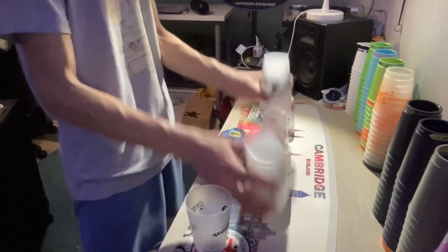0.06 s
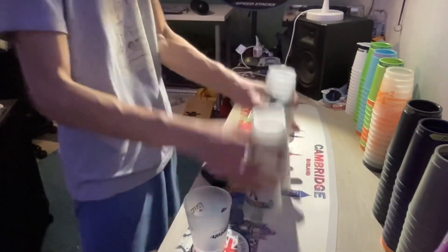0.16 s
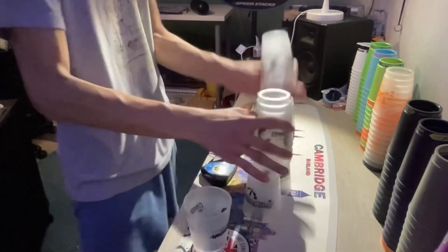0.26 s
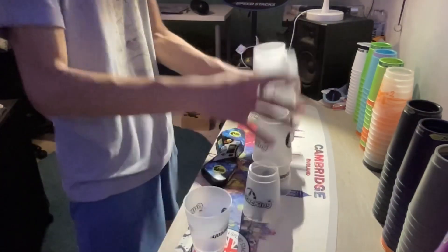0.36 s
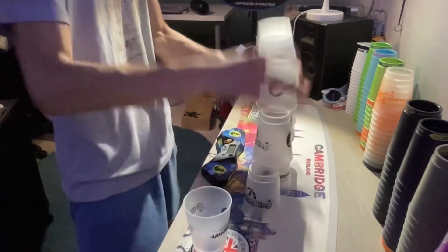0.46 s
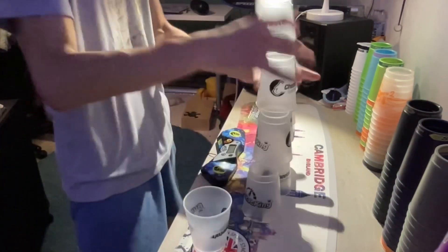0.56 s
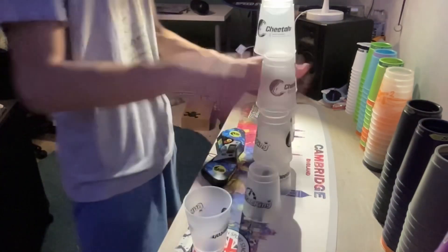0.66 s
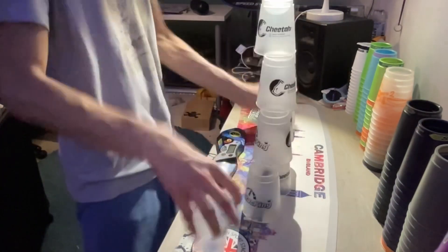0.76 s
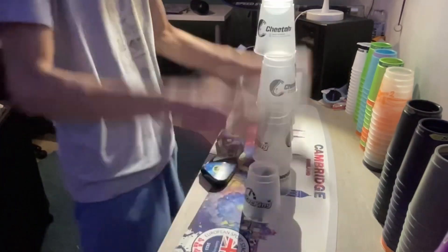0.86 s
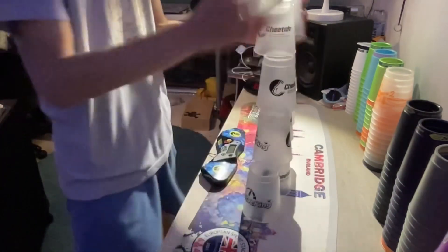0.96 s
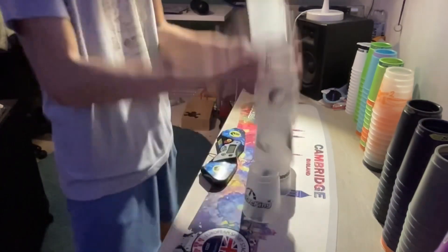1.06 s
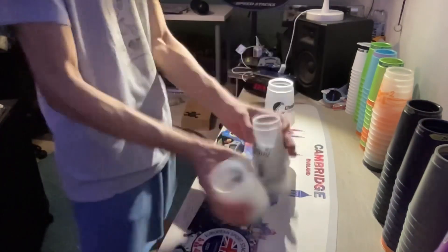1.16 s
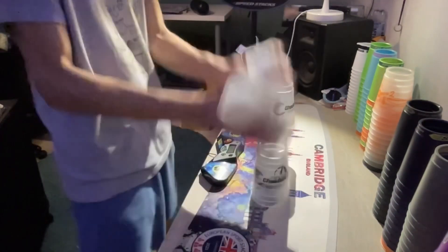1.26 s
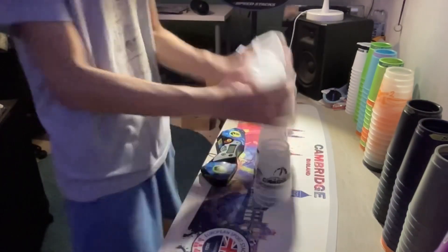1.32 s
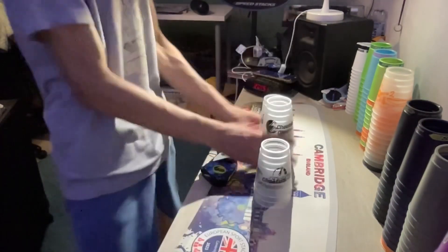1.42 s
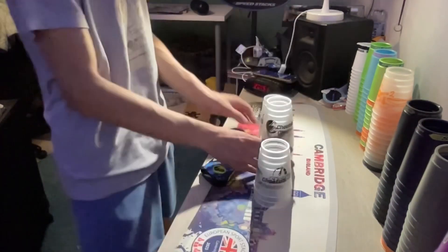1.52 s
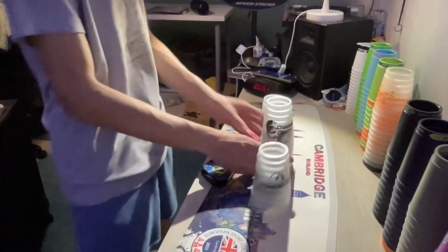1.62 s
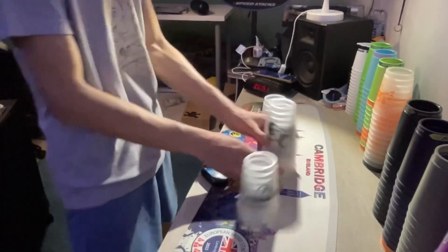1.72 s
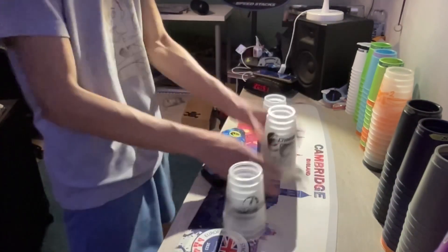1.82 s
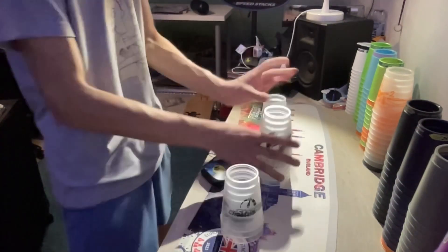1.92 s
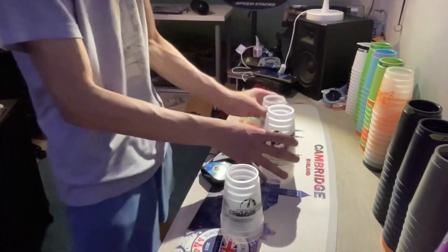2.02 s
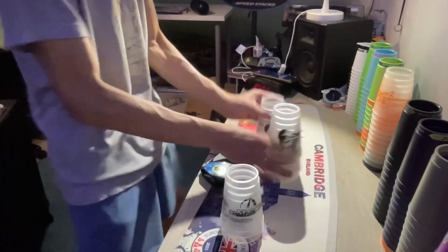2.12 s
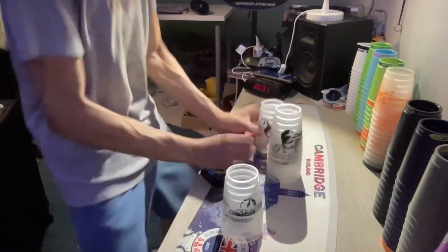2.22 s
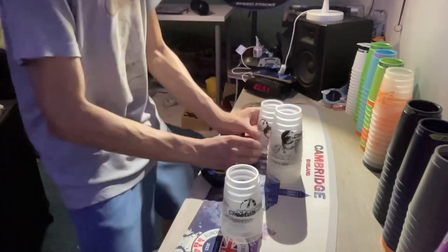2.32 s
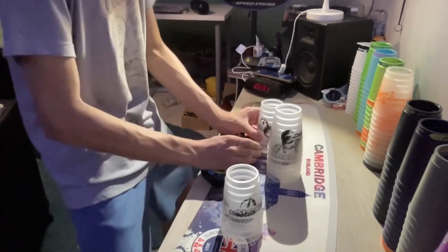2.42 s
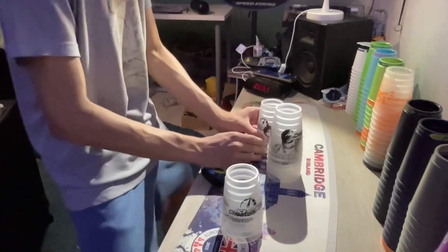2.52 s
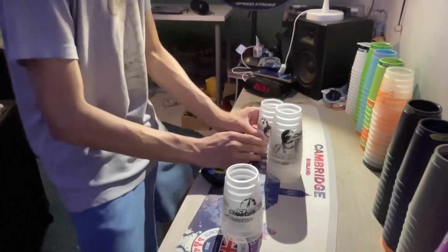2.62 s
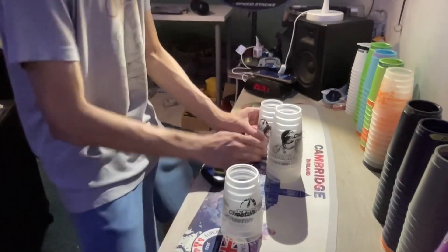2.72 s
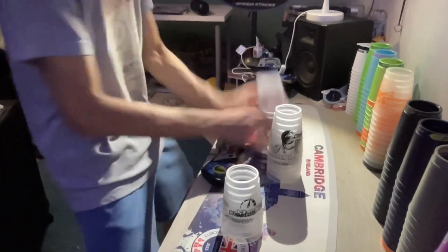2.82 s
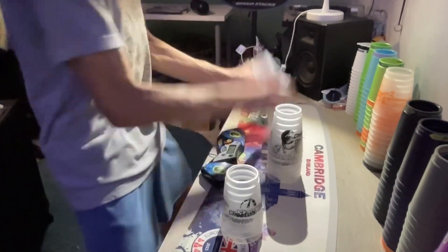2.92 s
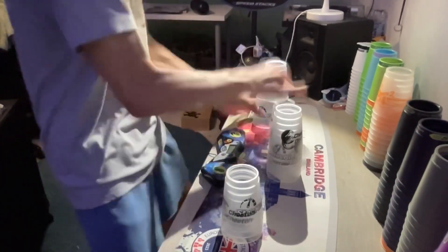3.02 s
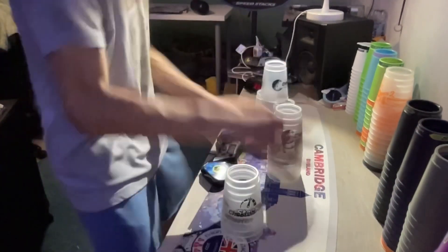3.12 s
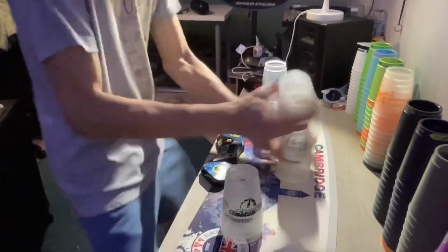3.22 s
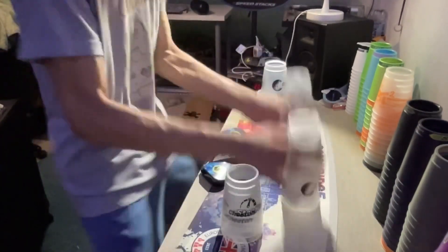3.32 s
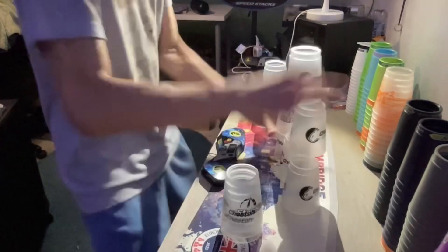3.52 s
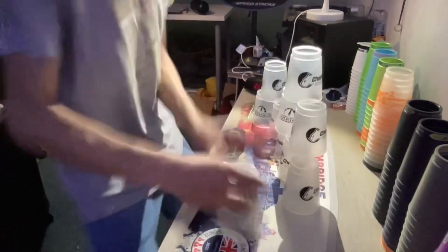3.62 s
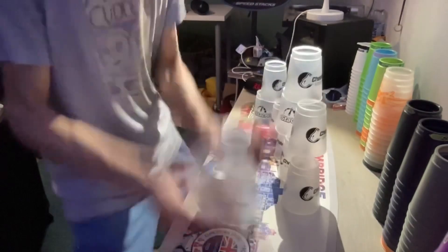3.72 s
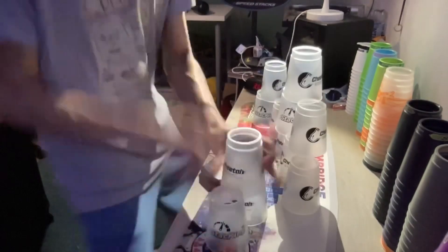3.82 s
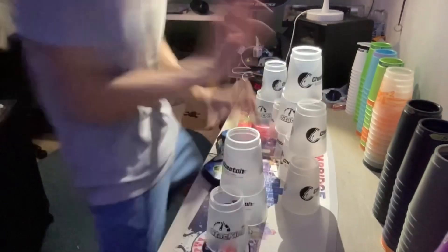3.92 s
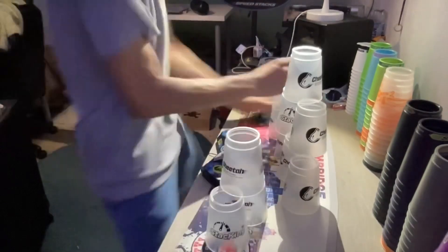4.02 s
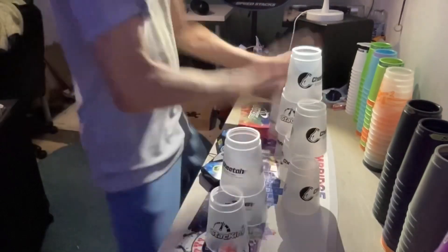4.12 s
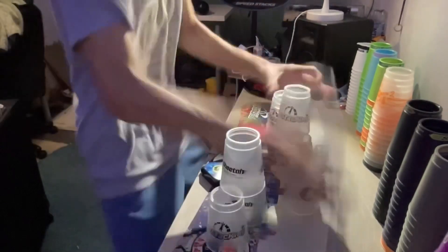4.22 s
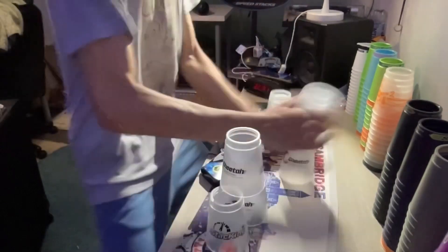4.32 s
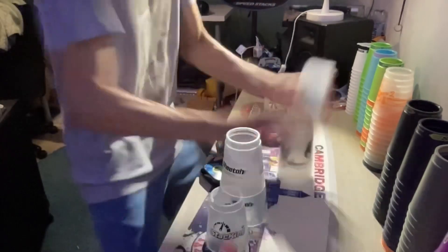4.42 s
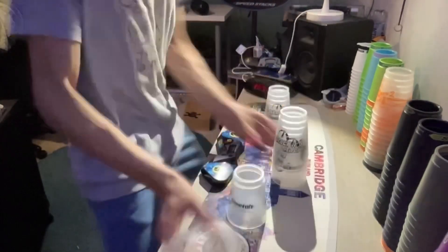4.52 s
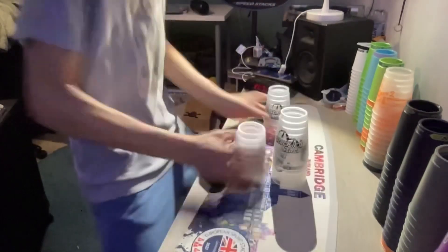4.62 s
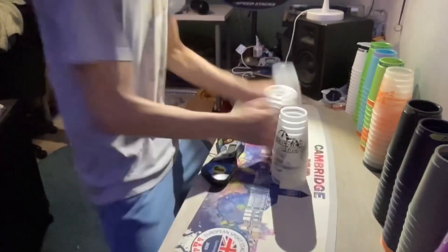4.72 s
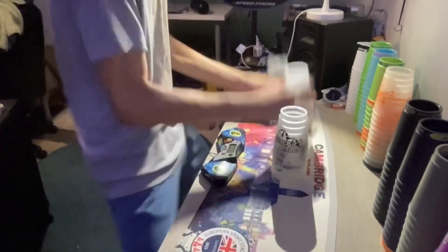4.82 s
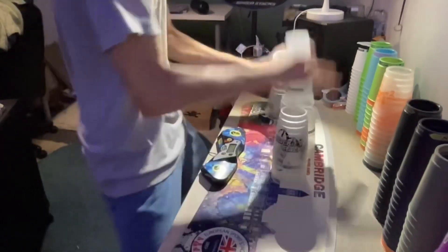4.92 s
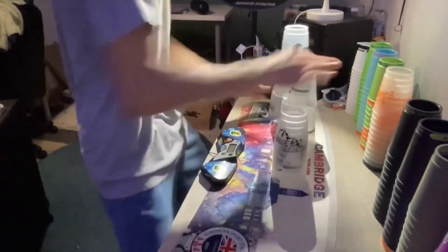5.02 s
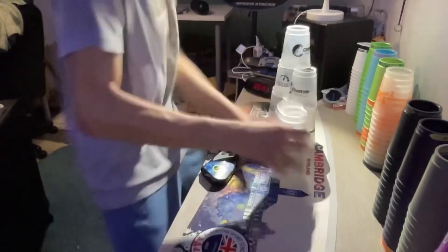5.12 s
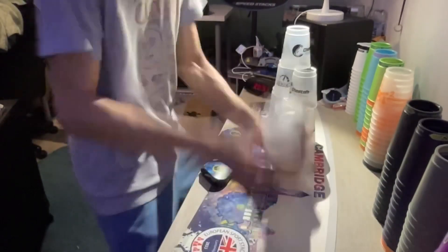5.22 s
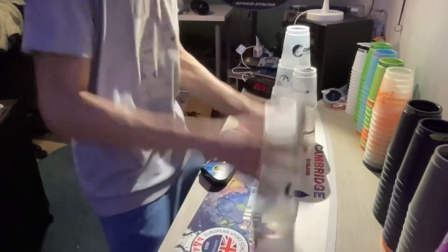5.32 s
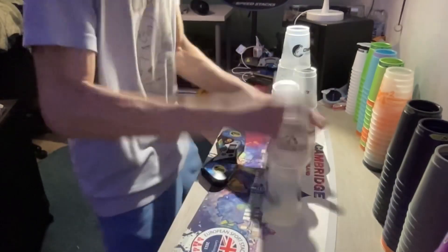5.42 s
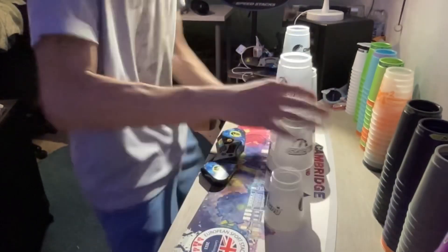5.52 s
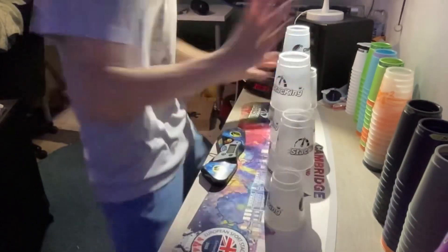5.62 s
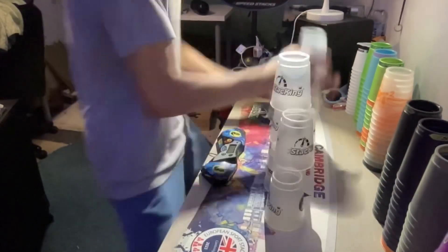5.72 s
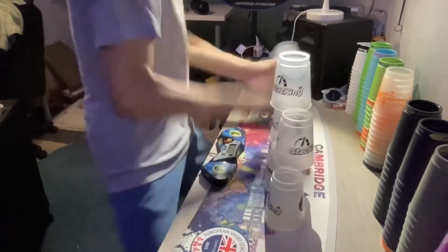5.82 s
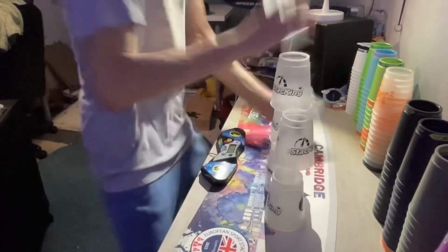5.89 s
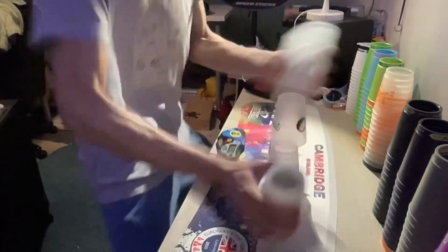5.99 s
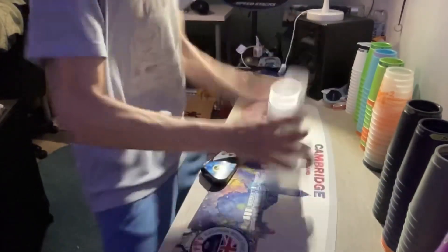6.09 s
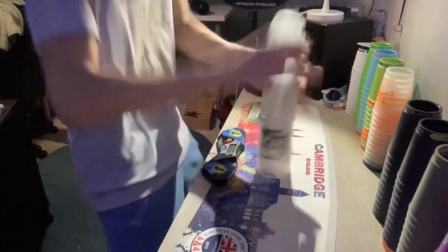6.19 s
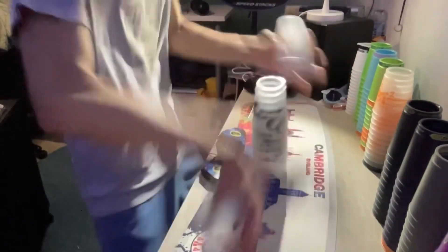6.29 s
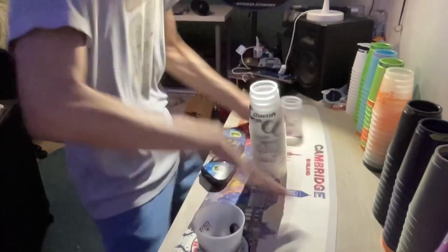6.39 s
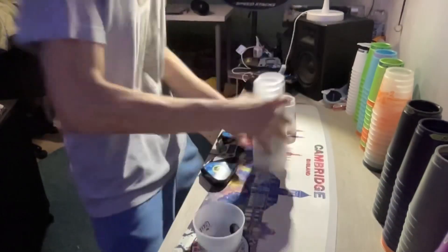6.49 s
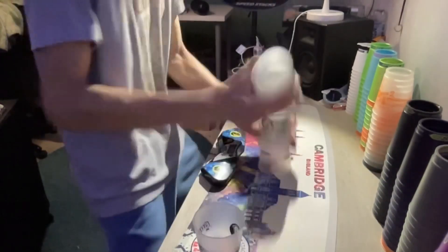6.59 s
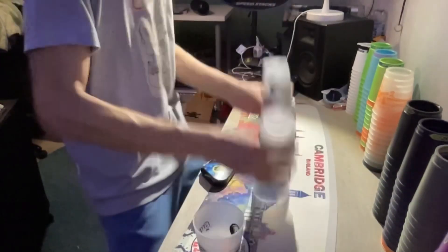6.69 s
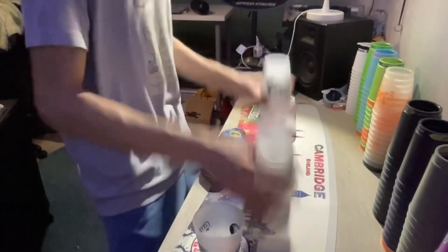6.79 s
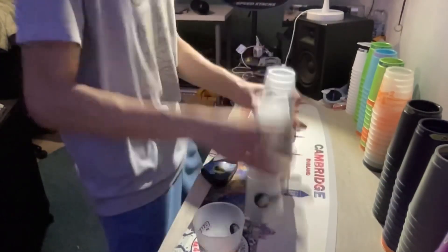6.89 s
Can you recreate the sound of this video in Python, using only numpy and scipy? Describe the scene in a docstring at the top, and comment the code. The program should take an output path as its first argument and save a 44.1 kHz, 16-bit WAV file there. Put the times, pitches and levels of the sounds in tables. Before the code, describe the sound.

Plastic cups are stacked into pyramids and swept down at speed on a desk with a mat. Quick hollow pops lead to a scraping clatter and a thump. After a lull with a few soft knocks, a longer, busier run of clacks, rubs and thuds follows, with one tiny squeak. The microphone is close in a small, quiet room.

```python
"""Quick hollow pops, clacks and scrapes: plastic cups stacked into pyramids and swept down at speed.
A caught cup flexes and pops; nesting cups rub, puff out air, crack together and buzz to rest.
One tight cup squeaks. Whole stacks thump a desk through its mat, in a small, quiet room.
The microphone is close, and the hardest blows overload it."""
import sys
import numpy as np
from scipy import signal
from scipy.fft import rfft, irfft, next_fast_len
from scipy.io import wavfile
from scipy.ndimage import uniform_filter1d, map_coordinates

SR = 44100
rng = np.random.default_rng(int(sys.argv[2]) if len(sys.argv) > 2 else 0)


def master_out(mix):
    """Clip the mix to full scale and print it as 16-bit PCM to the path in sys.argv[1]."""
    frames = np.transpose(np.atleast_2d(mix))
    ceiling = np.clip(frames, -1, 1)
    pcm = np.round(ceiling * 32767).astype(np.int16)
    wavfile.write(sys.argv[1], SR, pcm)


N = 306495
T = np.arange(int(0.4 * SR)) / SR  # time axis of one blow, s

# wall crack spectrum: f/Hz, level/dB
CRACK_SPECTRUM = [(400, -22), (900, 4.5), (1400, -2), (2000, -0.5), (2700, -16), (4000, -23.5), (9000, -64)]
# rim click spectrum: f/Hz, level/dB
RIM_SPECTRUM = [(1000, -43), (2500, 6), (4200, 6.5), (5500, 5.5), (8000, 2), (11000, -1), (15500, -2)]


def clacks():
    """A cup drives home into the next: a puff of trapped air, a hard crack, a thud in the desk."""
    # t/s, wall f/Hz, wall level/dB, rim level/dB, desk level/dB
    blows = [(1.034, 1464, -42, -43.5, -39.5), (1.054, 1400, -30, -34.5, -31.5),
             (1.106, 1245, -25, -29.5, -31.5), (1.162, 1880, -20.5, -20, -28.5),
             (1.189, 1536, -18, -19, -12), (1.428, 1423, -13.5, -17, -7), (2.244, 1914, -21.5, -24.5, -19),
             (3.809, 1734, -14, -33, -16.5), (4.145, 1860, -26, -27, -27), (4.259, 1500, -14, -13.5, -17.5),
             (4.275, 1183, -16.5, -9, -44), (4.286, 1955, -13, -17, -7.5), (4.3, 1980, -18, -16, -19.5),
             (4.383, 1590, -20.5, -19, -23.5), (4.417, 2240, -22, -21.5, -11),
             (4.515, 2120, -25.5, -27, -15), (4.552, 1395, -16.5, -15.5, -18), (4.57, 2020, -17, -10, -22),
             (4.648, 1450, -25.5, -31.5, -25), (4.691, 1674, -24.5, -29.5, -21),
             (5.811, 1540, -18, -20, -23), (5.831, 1320, -17, -17, -24), (5.97, 1321, -32, -25.5, -33),
             (5.99, 1366, -14, -19, -30.5), (6.01, 1145, -16.5, -18.5, -20), (6.028, 1585, -10, -18.5, -9),
             (6.078, 1640, -15, -17, -12.5), (6.113, 1170, -22.5, -29, -12), (6.167, 1556, -19.5, -28, -18),
             (6.211, 1500, -40, -30.5, -48), (6.275, 1450, -26, -24.5, -17.5),
             (6.401, 1897, -11, -30.5, -20)]
    out = np.zeros(N)
    for at_s, wall_hz, wall_db, rim_db, desk_db in blows:
        puff_hz = 531.5 * np.exp(0.12 * rng.standard_normal())
        tail = room_tail()
        puff = cup_note(puff_hz, t60_s=0.017, attack_s=0.0022, glide=0.11)
        sound = amp(wall_db - 0.5) * in_room(puff, tail, wet_db=-6.5)
        sound += amp(wall_db - 4.5) * in_room(wall_ring(wall_hz, damping=3.5), tail, wet_db=-10.5)
        spectrum = np.multiply(CRACK_SPECTRUM, [np.sqrt(wall_hz / 1500), 1])  # stiffer cracks higher
        crack = chatter(spectrum, t60_s=0.007, gap_s=0.007, bounce_db=-6, wet_db=0, room_t60_s=0.19)
        sound += amp(wall_db - 2.5) * crack
        click = rim_click(rim_db - wall_db, t60_s=0.0054, gap_s=0.0038, bounce_db=-2.5, wet_db=-3)
        sound += amp(rim_db - 0.37) * click
        sound += amp(desk_db + 1.5) * in_room(desk_thud(tilt_db_per_oct=-0.8), tail, wet_db=-8.5)
        add(out, at_s, sound)
    return out


def taps():
    """A caught cup flexes once with a snap and a short pop; then its rim settles."""
    # t/s, air f/Hz, air level/dB, wall level/dB, desk level/dB
    catches = [(0.05, 570, -22.5, -32.5, -23.5), (0.151, 730, -27.5, -28.5, -21),
               (0.216, 555, -24, -29.5, -29.5), (0.315, 590, -33, -38.5, -51),
               (0.338, 580, -26, -32, -28.5), (0.352, 710, -40, -37, -48),
               (0.396, 580, -33.5, -39.5, -47.5), (0.438, 615, -20, -25.5, -24),
               (0.501, 610, -37, -31, -40), (0.604, 586, -24, -35.5, -33), (1.745, 590, -59, -53.5, -43),
               (2.133, 508, -35, -36.5, -33.5), (2.897, 490, -48, -48.5, -34.5),
               (3.205, 508, -33.5, -49, -26.5), (3.367, 512, -24.5, -28, -21),
               (3.422, 554, -23.5, -36, -23), (3.49, 700, -26.5, -27.5, -22), (3.525, 673, -24.5, -35, -56),
               (3.793, 640, -38, -59, -30), (4.027, 670, -25.5, -36.5, -19),
               (4.077, 530, -27, -37.5, -19.5), (4.237, 490, -32, -53, -16.5), (4.335, 600, -21, -49, -27),
               (4.406, 616, -17, -33, -46), (4.49, 546, -39, -51, -18.5), (4.534, 510, -23.5, -27, -23.5),
               (4.666, 518, -17.5, -27, -45), (4.814, 640, -32, -39.5, -22.5),
               (4.902, 530, -25, -32.5, -24), (4.961, 670, -31, -62, -36), (4.997, 615, -30, -34, -27.5),
               (5.173, 600, -36, -42, -45), (5.332, 510, -43.5, -42.5, -28.5),
               (5.412, 535, -27.5, -38, -22), (5.474, 807, -27.5, -28.5, -26),
               (5.509, 580, -28.5, -25.5, -25), (5.738, 560, -32, -29, -28),
               (6.358, 496, -21.5, -14.5, -10.5), (6.562, 550, -28, -35.5, -27),
               (6.738, 684, -25, -26, -18), (6.796, 592, -21.5, -30, -25), (6.885, 690, -26.5, -29, -20.5),
               (6.94, 616, -25, -30, -27)]
    out = np.zeros(N)
    for at_s, air_hz, air_db, wall_db, desk_db in catches:
        tail = room_tail()
        pop = burst(cup_note(air_hz, t60_s=0.012, attack_s=0.00073, glide=0.02))
        after_ring = burst(cup_note(air_hz, t60_s=0.026, attack_s=0.0024, glide=0.017))
        add(pop, 0.0065, amp(-8.5) * after_ring)
        sound = amp(air_db + 2.5) * in_room(pop, tail, wet_db=-9)
        snap = cup_note(1450 * rng.uniform(0.73, 1.044), t60_s=0.0043, attack_s=0.00036, glide=0.02)
        sound += amp(wall_db - 5.5) * in_room(snap, tail, wet_db=-1)
        sound += amp(wall_db - 5) * chatter(
            CRACK_SPECTRUM, t60_s=0.007, gap_s=0.004, bounce_db=-5, wet_db=0, room_t60_s=0.14)
        rim_db = (air_db + wall_db) / 2 - 12.5
        click = rim_click(rim_db - wall_db, t60_s=0.008, gap_s=0.005, bounce_db=-1, wet_db=-3)
        add(sound, 0.001, amp(rim_db) * click)
        sound += amp(desk_db - 2.5) * in_room(desk_thud(tilt_db_per_oct=4), tail, wet_db=-9)
        add(out, at_s, sound)
    return out


def settles():
    """A cup lands on others and rocks on its rim; quick rebounds feed its air note and its wall."""
    # t/s, air f/Hz, air level/dB, wall f/Hz, wall level/dB, rim level/dB, desk level/dB
    landings = [(0.611, 478, -20, 1430, -20.5, -33.5, -31.5), (3.054, 644, -12.5, 1280, -20, -30, -22),
                (3.561, 629, -17.5, 1299, -20.5, -31.5, -24), (3.835, 747, -18, 1360, -19.5, -28, -23.5),
                (5.026, 614, -14, 1625, -24, -33.5, -36), (5.547, 693, -23.5, 1380, -17.5, -29, -25),
                (5.911, 623, -15.5, 1287, -21, -26, -18)]
    out = np.zeros(N)
    for at_s, air_hz, air_db, wall_hz, wall_db, rim_db, desk_db in landings:
        tail = room_tail()
        air_note = cup_note(air_hz, t60_s=0.075, attack_s=0.007, glide=0.04)
        sound = amp(air_db) * in_room(air_note, tail, wet_db=-14)
        rebounds_s = np.cumsum(0.0045 * rng.uniform(0.44, 1.6, size=4))
        for k, delay_s in enumerate(rebounds_s):
            puff = cup_note(air_hz * rng.uniform(0.9, 1.06), t60_s=0.01, attack_s=0.00047, glide=0.05)
            add(sound, delay_s, amp(air_db - 6 - 2.4 * k) * burst(puff))
        wall_note = cup_note(wall_hz, t60_s=0.048, attack_s=0.004, glide=0.07)
        sound += amp(wall_db - 3) * in_room(wall_note, tail, wet_db=-14)
        sound += amp(wall_db - 5) * in_room(wall_ring(wall_hz, damping=1.8), tail, wet_db=-2)
        sound += amp(wall_db - 5.5) * chatter(
            CRACK_SPECTRUM, t60_s=0.017, gap_s=0.0074, bounce_db=-1.5, wet_db=-5.5, room_t60_s=0.25)
        click = rim_click(rim_db - wall_db, t60_s=0.0074, gap_s=0.0024, bounce_db=-0.4, wet_db=2)
        sound += amp(rim_db + 2.5) * click
        sound += amp(desk_db + 1.5) * in_room(desk_thud(tilt_db_per_oct=2.5), tail, wet_db=-6)
        add(out, at_s, sound)
    return out


def cup_note(hz, t60_s, attack_s, glide):
    """One resonance of a cup and its air; it drops as the gap closes. A small cup radiates no bass."""
    pitch_hz = hz * (1 + glide * (np.exp(-T / 0.0078) - 0.5))
    phase = 2 * np.pi * np.cumsum(pitch_hz) / SR
    ring = -np.sin(phase) * fade(t60_s) * (1 - np.exp(-T / attack_s))
    return butterworth(ring, 190, "high")


def wall_ring(wall_hz, damping):
    """The thin wall rings briefly, with new mode strengths at each blow."""
    # f/wall_hz, level/dB, t60/s at damping 1
    modes = [(0.721, -3, .05), (0.882, -5.5, 0.13), (1.001, 0.5, 0.083), (1.129, -6, 0.084),
             (1.309, -6.5, 0.095), (1.499, -2, 0.062), (1.817, -12, 0.049)]
    ring = np.zeros(len(T))
    for ratio, db, t60_s in modes:
        gain = amp(db + rng.normal(0, 1.2))
        hz = wall_hz * ratio * rng.normal(1, 0.014)
        ring += gain * np.sin(2 * np.pi * (hz * T + rng.random())) * fade(t60_s / damping)
    return burst(ring * (1 - np.exp(-T / 0.00057)))


def rim_click(hardness_db, t60_s, gap_s, bounce_db, wet_db):
    """The rim clicks and rebounds; a harder contact reaches further into the treble."""
    click = chatter(RIM_SPECTRUM, t60_s, gap_s, bounce_db, wet_db, room_t60_s=0.19)
    corner_hz = np.clip(13000 * 2 ** (hardness_db / 15), 6000, 0.45 * SR)
    return burst(butterworth(click, corner_hz, "low"))


def chatter(spectrum, t60_s, gap_s, bounce_db, wet_db, room_t60_s):
    """A crack, three rebounds at uneven gaps, and their diffuse wash in the room."""
    power = fade(t60_s) ** 2
    rebounds_s = np.cumsum(gap_s * rng.uniform(0.77, 1.1, size=3))
    for k, delay_s in enumerate(rebounds_s, start=1):
        rebound = fade(t60_s) * amp(bounce_db * k + rng.normal(0, 0.57))
        add(power, delay_s, rebound ** 2)
    pole = amp(-120 / (room_t60_s * SR))
    wash = signal.lfilter([1 - pole], [1, -pole], power)
    envelope = np.sqrt(power + amp(wet_db) ** 2 * wash)
    return burst(coloured(shell_noise(len(T)) * envelope, spectrum))


def shell_noise(samples, depth_db=3.2):
    """Noise in which brief shell resonances stand out as the contact point moves."""
    bins = signal.stft(rng.standard_normal(samples), nperseg=256)[2]
    patches = uniform_filter1d(rng.standard_normal(bins.shape), size=3, axis=0)
    patches = uniform_filter1d(patches, size=7, axis=1)
    return signal.istft(bins * amp(depth_db * unit(patches)), nperseg=256)[1][:samples]


def desk_thud(tilt_db_per_oct):
    """The desk top thuds under the soft mat; heavy blows tilt toward its low modes."""
    # f/Hz, level/dB, t60/s
    modes = [(61.7, -25, 0.52), (81, -28.5, 0.096), (133.5, 0, 0.11), (151.1, 4.5, 0.1), (189, -5, 0.099),
             (245, 1.5, 0.099), (335.6, 3, 0.052), (455, -2.5, 0.057), (547.7, -4.5, 0.081)]
    ring = np.zeros(len(T))
    for k, (hz, db, t60_s) in enumerate(modes):
        gain = amp(db + tilt_db_per_oct * np.log2(hz) + rng.normal(0, 3.7))
        ring += (-1) ** k * gain * np.sin(2 * np.pi * hz * rng.normal(1, 0.01) * T) * fade(t60_s)
    push = np.sin(2 * np.pi * 145 * T) * fade(0.04)  # the whole top moves at once
    thud = burst(ring) + amp(-10.5) * burst(push)
    return burst(butterworth(thud, 85, "high"))


def sliding():
    """Plastic sticks and slips on plastic; the grains hiss and stir the air in the cups."""
    # t/s, length/s, scrape level/dB, hollow level/dB
    slides = [(0, 0.005, -45, -29), (0.09, 0.099, -56, -44), (0.23, 0.068, -52, -40),
              (0.45, 0.052, -41.5, -28.5), (0.6, 0.02, -52, -38), (1.044, .15, -22.5, -25.5),
              (1.313, .07, -59, -54.5), (1.364, 0.056, -23, -22), (1.681, 0.132, -62.5, -62),
              (2.197, 0.056, -50, -50), (2.775, 0.082, -45.5, -57), (3.19, 0.053, -41, -34.5),
              (3.41, 0.039, -42.5, -42), (3.513, 0.033, -32, -22), (3.683, 0.018, -38, -39),
              (3.952, 0.067, -40, -47.5), (4.11, 0.24, -26.5, -23), (4.394, 0.17, -26.5, -27),
              (4.661, 0.036, -28.5, -39), (4.774, .2, -44.5, -38.5), (5.004, 0.015, -31.5, -22.5),
              (5.181, 0.021, -36.5, -35), (5.272, 0.05, -54, -71), (5.344, 0.21, -38.5, -34.5),
              (5.658, 0.15, -40.5, -50), (5.75, 0.095, -28.5, -24.5), (5.966, 0.048, -13.5, -16),
              (6.085, 0.071, -28, -21.5), (6.497, 0.098, -43.5, -48.5), (6.68, 0.072, -51.5, -54),
              (6.774, 0.32, -53.5, -40)]
    scrape_gain, hollow_gain = np.zeros((2, N))
    for at_s, length_s, scrape_db, hollow_db in slides:
        scrape_gain += amp(scrape_db) * stroke(at_s, length_s, fall_db_per_s=267)
        hollow_gain += amp(hollow_db) * stroke(at_s, length_s, fall_db_per_s=238)
    grip_db = 3.8 * wobble(170)
    slips = shell_noise(N) * amp(grip_db + 3.2 * wobble(900))
    stirred_air = rng.standard_normal(N) * amp(grip_db)
    # rubbed plastic and cup cavity: f/Hz, level/dB
    scrape_spectrum = [(300, -27), (900, 0), (1500, 11.5), (2100, 4), (2900, 6), (5000, 3.5), (8000, -1),
                       (11000, -8), (15500, -11.5)]
    hollow_spectrum = [(50, -37), (100, -26.5), (140, -14), (200, 7.5), (340, -3), (450, 0), (610, 4),
                       (780, -0.5), (1000, -22), (2000, -43)]
    scrape = amp(-1.5) * scrape_gain * unit(coloured(slips, scrape_spectrum))
    hollow = hollow_gain * unit(coloured(stirred_air, hollow_spectrum))
    return reverberate(scrape + hollow, room_tail(), wet_db=-7.5)


def stroke(at_s, length_s, fall_db_per_s, attack_s=0.012, swell_db=9.5):
    """Gain of one slide: contact, a swell as the cups tighten, a steady fall once they stop."""
    t = np.arange(N) / SR - at_s
    contact = np.clip(t / attack_s, 0, 1)
    to_go = np.clip(1 - t / length_s, 0, 1)
    return contact * amp(-swell_db * to_go - fall_db_per_s * np.maximum(t - length_s, 0))


def squeak():
    """Regular stick and slip, quickening as a tight cup wedges in."""
    # t/s, f/Hz, level/dB
    contour = [(4.543, 1307, -39), (4.551, 1460, -2), (4.558, 1472, -11.5), (4.565, 1728, 5.5),
               (4.564, 1867, -3), (4.594, 2000, -27), (4.604, 2204, -42)]
    times_s, hz, db = np.transpose(contour)
    t = times_s[0] + T
    phase = 2 * np.pi * np.cumsum(np.interp(t, times_s, hz)) / SR
    envelope = amp(np.interp(t, times_s, db, right=-120) - 4.5)
    tone = envelope * (np.sin(phase) + amp(-17) * np.sin(2 * phase))
    out = np.zeros(N)
    add(out, times_s[0], reverberate(tone, room_tail(), wet_db=-9.5))
    return out


def set_downs():
    """The mat cushions a stack put down softly: mostly desk, with a trace of cup."""
    # t/s, level/dB
    landings = [(0.8, -21.5), (1.991, -28.5), (2.04, -38), (2.847, -40), (3.011, -28.5), (3.183, -22),
                (3.314, -26.5), (3.674, -23.5), (5.165, -18.5), (6.53, -21.5)]
    out = np.zeros(N)
    for at_s, db in landings:
        touch = chatter(CRACK_SPECTRUM, 0.012, gap_s=0.008, bounce_db=-3, wet_db=-2, room_t60_s=0.18)
        graze = chatter(RIM_SPECTRUM, 0.02, gap_s=0.008, bounce_db=-1, wet_db=-2, room_t60_s=0.18)
        thud = in_room(desk_thud(tilt_db_per_oct=-5), room_tail(), wet_db=-2.5)
        add(out, at_s, amp(db - 8) * (thud + amp(-24) * touch + amp(-24.5) * graze))
    return out


def booms():
    """A stack lands under the hands' weight and stirs the low modes of desk and room."""
    # t/s, level/dB
    landings = [(1.433, -39), (2.248, -40.5), (4.291, -38), (6.028, -32)]
    # span of those modes: low f/Hz, high f/Hz
    band_hz = [40, 72]
    out = np.zeros(N)
    for at_s, db in landings:
        rumble = butterworth(rng.standard_normal(len(T)) * fade(0.36), band_hz, "band")
        add(out, at_s, amp(db + 9.5) * burst(rumble))
    return out


def room_tail(gap_s=0.0034):
    """Room impulse response of energy 1, silent until the nearest wall answers."""
    # f/Hz, t60/s
    decay_times = [(100, 0.07), (300, 0.23), (700, 0.15), (1400, 0.2), (4000, 0.024), (8000, 0.13),
                   (15000, 0.11)]
    hz, t, bins = signal.stft(rng.standard_normal(len(T)), SR, nperseg=256)
    decay = amp(-60 * t / along(decay_times, hz)[:, None])
    tail = signal.istft(bins * decay, SR, nperseg=256)[1][:len(T)]
    tail *= T > gap_s
    return tail / np.linalg.norm(tail)


def reverberate(x, tail, wet_db):
    """Direct sound plus the room's reflections."""
    return x + amp(wet_db) * signal.fftconvolve(x, tail)[:len(x)]


def in_room(x, tail, wet_db):
    """A blow and its reverberation, scaled to one burst."""
    return burst(reverberate(x, tail, wet_db))


def background(floor_db=-69, tick_peak_db=-41.5):
    """Quiet room noise, with faint dry ticks while the hands rest."""
    # f/Hz, level/dB
    floor_spectrum = [(25, -6), (60, -10), (140, -4), (400, -13.5), (1000, -26), (4000, -26), (10000, -30),
                      (15700, -47.5)]
    # t/s
    ticks_s = [1.6535, 2.494, 2.6232, 2.7395, 2.974]
    noise = filtered(rng.standard_normal(N), lambda hz: amp(along(floor_spectrum, hz)))
    out = amp(floor_db) * unit(noise)
    for at_s in ticks_s:
        tick = butterworth(rng.standard_normal(len(T)) * fade(0.0051), [2200, 9000], "band", order=3)
        add(out, at_s, amp(tick_peak_db) * tick / abs(tick).max())
    return out


def amp(db):
    """Decibels to gain."""
    return 10 ** (np.asarray(db) / 20)


def unit(x):
    """x at rms 1."""
    return x / np.sqrt(np.mean(x ** 2) + 1e-20)


def burst(x):
    """x scaled to the energy of 20 ms at rms 1."""
    return x / np.sqrt(np.sum(x ** 2) / (0.02 * SR) + 1e-20)


def fade(t60_s):
    """Exponential decay over T."""
    return amp(-60 * T / t60_s)


def wobble(rate_hz):
    """Smooth random curve with knots at rate_hz."""
    knots = rng.standard_normal(int(N * rate_hz / SR) + 4)
    return map_coordinates(knots, [np.arange(N) * rate_hz / SR])


def along(points, hz):
    """(f/Hz, value) points interpolated on a log axis."""
    knots_hz, values = np.transpose(points)
    return np.interp(np.log(hz + 1), np.log(knots_hz), values)


def butterworth(x, corner_hz, kind, order=2):
    """Causal low, high or band pass."""
    return signal.sosfilt(signal.butter(order, corner_hz, kind, fs=SR, output="sos"), x)


def filtered(x, response):
    """Zero-phase filter with gain response(hz)."""
    size = next_fast_len(len(x) + 8192)
    return irfft(rfft(x, size) * response(np.fft.rfftfreq(size, 1 / SR)), size)[:len(x)]


def coloured(x, spectrum, size=2048):
    """Minimum-phase filter with the given spectrum."""
    gain = amp(along(spectrum, np.fft.rfftfreq(size, 1 / SR)))
    cepstrum = irfft(np.log(gain))
    cepstrum[1:size // 2] *= 2
    cepstrum[size // 2 + 1:] = 0
    return signal.fftconvolve(x, irfft(np.exp(rfft(cepstrum))))[:len(x)]


def add(track, at_s, sound):
    """Mix sound into track in place."""
    part = track[max(0, round(at_s * SR)):][:len(sound)]
    part += sound[:len(part)]


def scene():
    """Cups, desk and room at one microphone."""
    blows = taps() + clacks() + settles() + set_downs() + booms()
    return (blows + squeak() + sliding() + background())[None]


def record(dry):
    """The loudest peaks clip flat; the band ends steeply."""
    top_hz, edge_hz = 15800, 400
    clipped = np.clip(dry[0], -1, 1)
    return filtered(clipped, lambda hz: np.clip((top_hz - hz) / edge_hz + 0.5, 0, 1))[None]


dry = scene()
out = record(dry)
master_out(out)
```